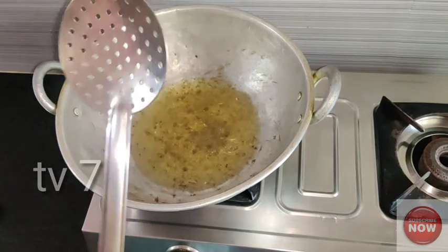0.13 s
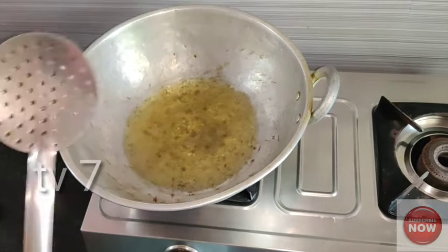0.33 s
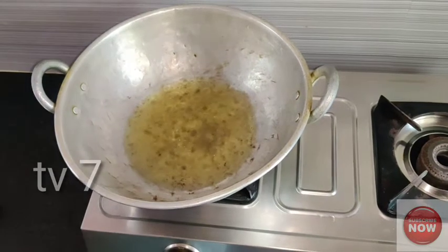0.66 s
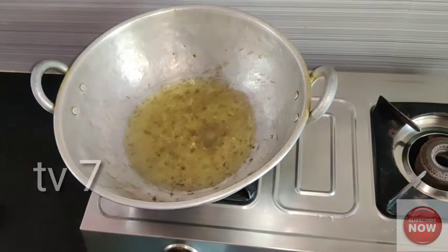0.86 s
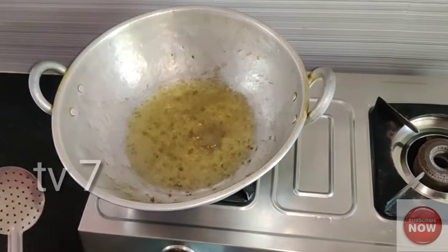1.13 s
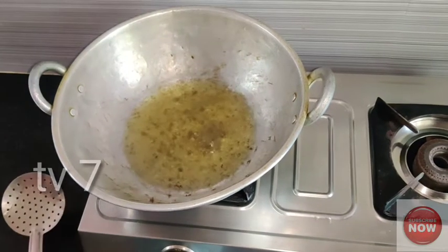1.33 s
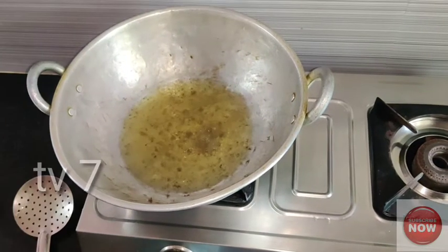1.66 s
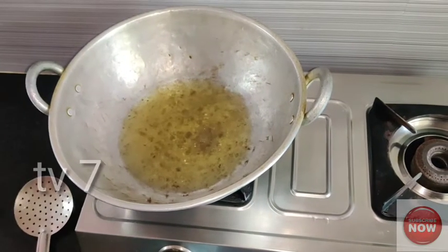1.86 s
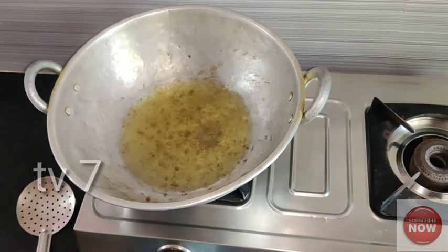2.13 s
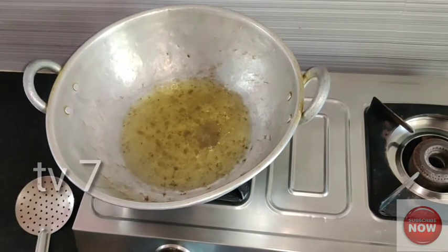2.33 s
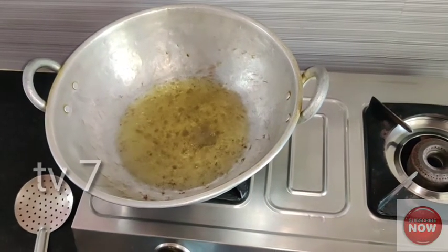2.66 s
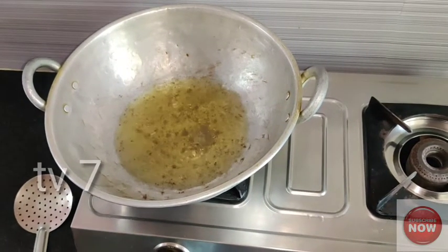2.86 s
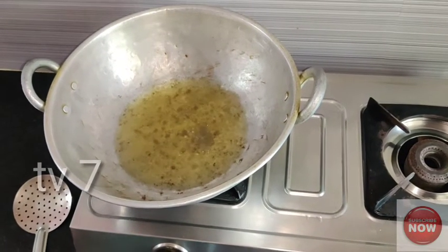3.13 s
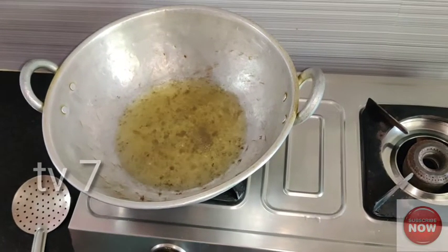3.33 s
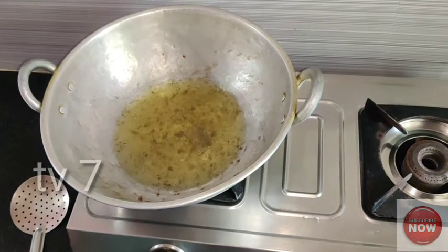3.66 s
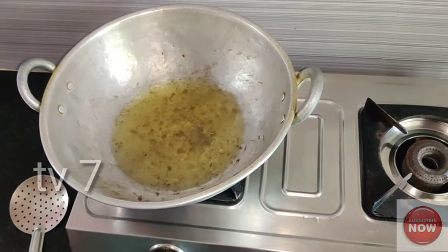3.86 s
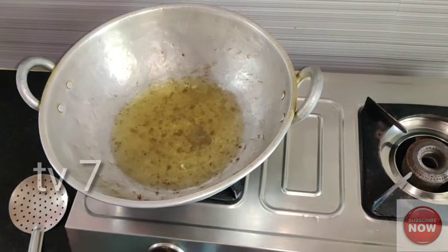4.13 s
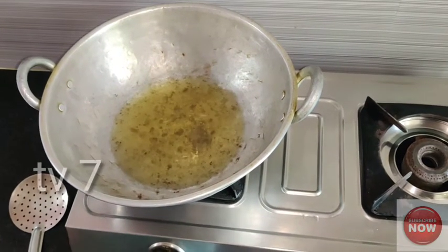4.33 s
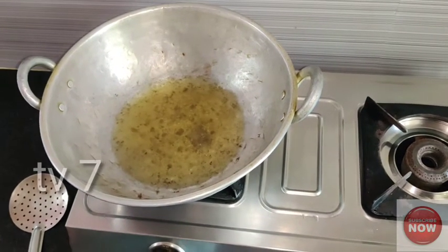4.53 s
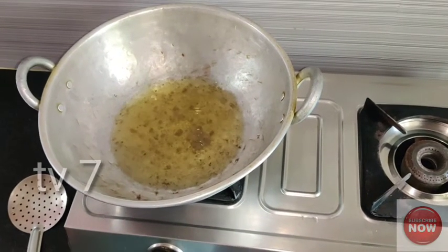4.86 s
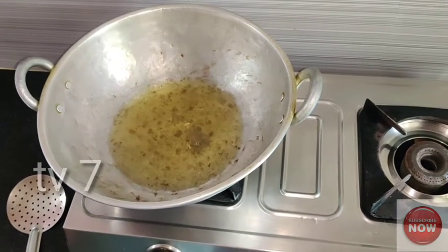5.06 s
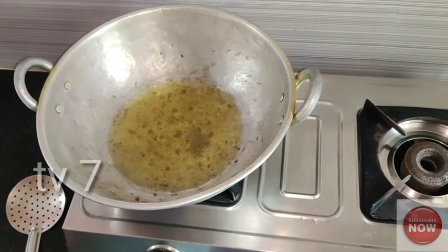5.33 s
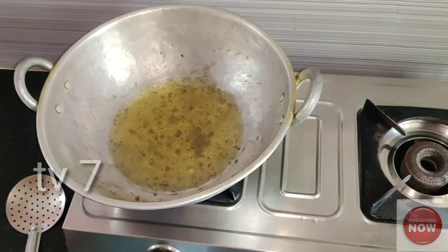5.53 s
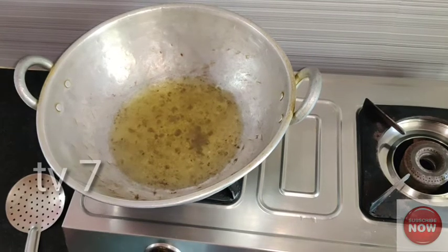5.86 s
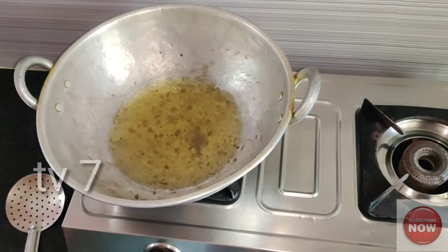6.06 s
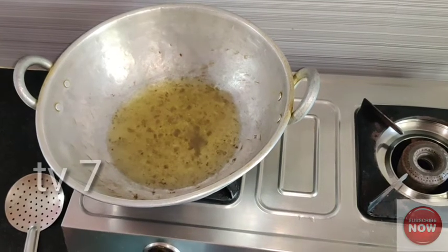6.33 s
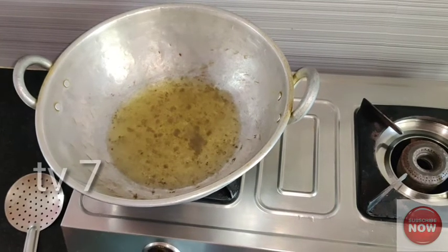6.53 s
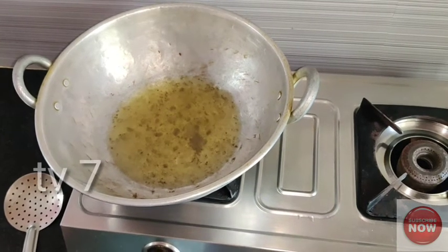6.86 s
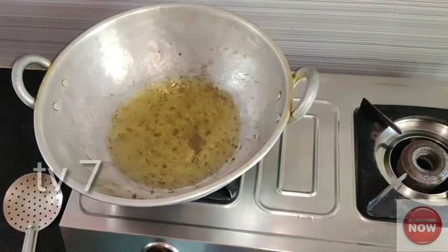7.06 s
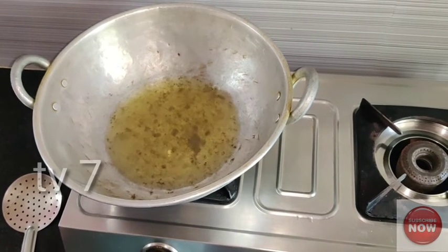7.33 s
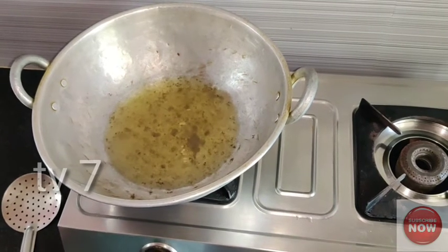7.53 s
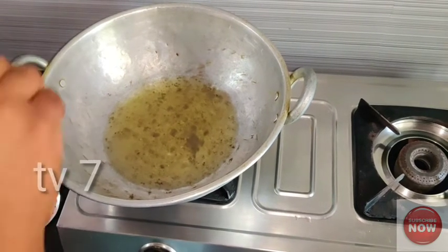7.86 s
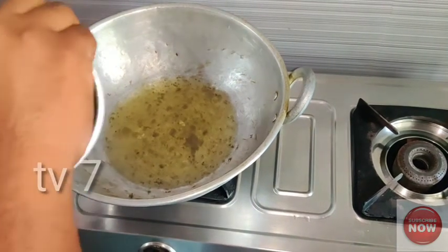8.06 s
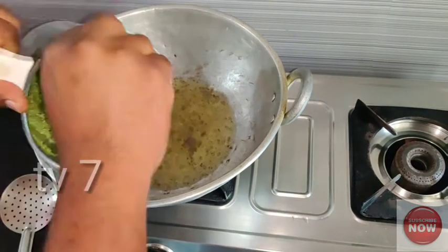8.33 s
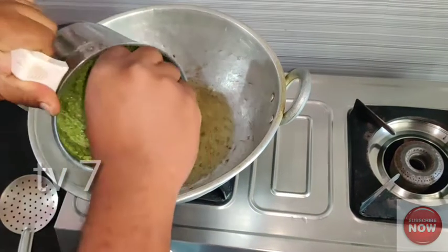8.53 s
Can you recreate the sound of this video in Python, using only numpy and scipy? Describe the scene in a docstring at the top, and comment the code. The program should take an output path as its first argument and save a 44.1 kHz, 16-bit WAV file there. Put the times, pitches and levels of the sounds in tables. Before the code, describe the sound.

Hot oil sizzles with a soft, fine hiss in a metal pan, heard from close above in a kitchen. From the start, seeds burst in sharp, irregular pops, each with a small metallic plink and a short echo. Between about 0.7 and 1.2 seconds, a skimmer is laid on the counter with a few dull, clattering knocks; a lighter clunk follows at 3.6 seconds. The popping is thickest from 1 to 3 seconds, stays lively until 5, then thins to occasional bursts. Dry, very close snaps cut through around 1.3, 1.5 and 4.6 seconds, and loudest at 6, 6.9 and 8 seconds. The sizzle slowly calms but continues to the end, near 8.7 seconds. A faint low rumble and hum lie underneath, and a distant engine swells gently outside around 5, 6.5 and 8.5 seconds.

```python
"""Hot oil sizzles and seeds burst in a deep metal pan on a gas stove, heard from a phone held above it.
Each shell cracks, its jet of steam sounds two pitches, the pan rings and the hard kitchen echoes.
The sizzle of tiny steam bubbles slowly calms, and a skimmer is laid on the counter.
Farther off, outside, an engine drones over street murmur, a motor hum and a low rumble.
The phone's limiter pulls everything down for a moment after the sharpest snaps."""
import sys
import numpy as np
from scipy import signal
from scipy.fft import rfft, irfft
from scipy.io import wavfile
from scipy.ndimage import uniform_filter1d, minimum_filter1d

SR = 44100
rng = np.random.default_rng(int(sys.argv[2]) if len(sys.argv) > 2 else 0)


def log_audio(samples):
    """Write samples as a 16-bit WAV file to the path given in sys.argv[1]."""
    # one column per channel
    frames = np.atleast_2d(samples).T
    # limit to full scale, then quantise
    limited = np.clip(frames, -1, 1)
    pcm = np.round(limited * 32767).astype(np.int16)
    wavfile.write(sys.argv[1], SR, pcm)


N = 383669

# Seeds bursting in the pan below the phone, plus the clatter of two counter knocks (1.14 and 3.57 s).
# Each row: start in seconds, strength in dB; then, all in dB, bass and treble over strength, top edge
# over treble, left minus right, kitchen echo; last, the steam pocket's low and high pitch in Hz.
BURSTS = [(0.1242, -38, -9, 6, -3, -7, -5, 2340, 8140), (0.3861, -30.5, -23, 15, -25, 0, -12, 3920, 5100),
          (0.4372, -14.5, -26, 1, -17, 1, -10.5, 2550, 5400),
          (0.5392, -50, 0, 18.5, -13, -8, -5, 2490, 6100), (0.5946, -28, -17, 4, -11, -3, -7.5, 3550, 7850),
          (0.633, -37, -1, 8, -6, -3, -7, 3340, 6060), (0.659, -28.5, -4, 8, -29, 0, -6, 2310, 8400),
          (0.9232, -15, -30, 4.5, -11, 2, -10.5, 2530, 6210),
          (1.0034, -28.5, -8, 2.5, -18, 11.5, -13, 2220, 6070),
          (1.1119, -41.5, -3.5, 6, -1, -6, 2.5, 2900, 8200),
          (1.1429, -34.5, -2.5, 0, -8.5, 0, 1, 1640, 6430),
          (1.3208, -19.5, -4.5, 11.5, -3, 6, -10, 3860, 6330),
          (1.3523, -20, -21, 7.5, -3, 8, -4.5, 2000, 5100),
          (1.4202, -30.5, -13, 2.5, -19, 15, 0, 3030, 5920),
          (1.4568, -20.5, -25, 7.5, 1, 18, -13, 3460, 4080),
          (1.528, -29, -12.5, 6.5, -6, 6, -0.5, 3050, 5800),
          (1.7504, -17, -12, 3, -10, 7.5, -10, 1980, 6260), (1.8377, -18.5, -36, 2, -6, 2, -8, 2480, 5940),
          (1.8766, -19, -12, 3.5, -5, 3.5, -3.5, 2300, 5870),
          (2.0234, -20.5, -8.5, 1, -20, 0.5, -8.5, 2600, 4650),
          (2.0907, -22.5, -21, 2, -10, -2, -3.5, 3940, 4400),
          (2.1084, -26, -10, 16.5, -7, 0, -10.5, 2160, 6320), (2.1304, -39, 1, 22, 6.5, 6, -14, 3850, 4800),
          (2.2846, -25.5, -35, 11, -8, 13, -11, 3900, 3800),
          (2.3298, -27.5, -7.5, -3, -5, 16.5, -2.5, 2490, 5730),
          (2.3635, -26, -20, 6, -9, 3, -9, 2300, 6200), (2.3694, -17.5, -32, 2.5, -1.5, 0, -8, 3080, 6100),
          (2.4002, -32, -1, 11, -18, 8, -7, 1870, 5760), (2.4604, -19.5, -35, 5, -4, 7, -6, 2270, 4930),
          (2.4857, -37.5, -13, 20.5, -5, 12, -10, 4000, 5700),
          (2.5366, -15, -17, 6, -2.5, 4, -8.5, 1844, 6080), (2.6548, -27, -11, 8.5, -11, 8, -8, 2400, 6100),
          (2.7124, -36.5, -6.5, 3.5, -5, 4, 4.5, 2490, 5800),
          (2.7856, -20, -11.5, 8.5, -6, 6, -10, 2510, 6040),
          (3.1403, -32.5, 2, -0.5, 1.5, -3, -8.5, 2120, 6410),
          (3.2328, -34.5, -3, 10.5, -13, 0, -1, 1890, 8850),
          (3.3977, -16.5, -21, 5.5, -2, 3, -8.5, 2540, 5990),
          (3.5111, -20.5, -14.5, 8, -5.5, 3.5, -7, 3270, 5420),
          (3.5726, -21, 4, 0.5, -21, 0.5, -13.5, 3100, 5800),
          (3.6764, -20, -29, 6, -5, 0, -12.5, 3650, 4370), (3.7155, -30, -14, 7, -17, 3, -6.5, 3060, 4960),
          (3.8598, -22, -14, 2.5, -30, -1, -11, 2120, 4070),
          (3.894, -19, -7, 1, -7.5, -1, -8.5, 2100, 4500),
          (4.0415, -32.5, -29, 1.5, -8, -6, -5, 2260, 8000),
          (4.1213, -25.5, -2.5, 6.5, -7, -3.5, -11, 3190, 6060),
          (4.3009, -30.5, -18, 5.5, -2, -1, -6.5, 2040, 7900),
          (4.3868, -17, -11.5, -3.5, -29, -2.5, -11.5, 3600, 5330),
          (4.6673, -19, -24, 5.5, 0.5, 7.5, -9, 2170, 6100),
          (4.7207, -22.5, -17, 3.5, -7, 8, -7.5, 3080, 4200),
          (4.781, -20.5, -17.5, 4, -4, -2, -8.5, 2390, 6050),
          (4.9695, -31.5, -3, 8.5, -21, 1, -7.5, 2040, 6840), (5.44, -56, 6, 22.5, -4, -10, -9, 3850, 8900),
          (5.5437, -20, -8.5, 6.5, -8, 4.5, -12.5, 3800, 6340),
          (5.668, -43, -6, 6, -3, -2, -1.5, 2040, 5840),
          (5.856, -21.5, -18.5, -1.5, -23.5, -1, -9, 2086, 5930),
          (6.2906, -37.5, -13, 10.5, -13, -1, -9, 2960, 6200),
          (7.5921, -30, -18, 9.5, -10, -0.5, -7.5, 3100, 7500),
          (7.8288, -59, 10, 24, 0, -12, -12, 1540, 8100)]
# Tone of a burst. Each row: frequency in Hz, relative level in dB.
BURST_COLOUR = [(320, -70), (550, -98), (701, -11.5), (808, -19.5), (958, -14), (1100, -16.5),
                (1510, -17.5), (1790, -5), (1920, -3.5), (2350, -0.5), (3980, -1), (6090, 0), (10000, -7.5),
                (15100, -32), (16500, -98)]
# Edges in Hz of four bands: bass, middle, treble, top edge.
BAND_EDGES = (600, 1500, 4000, 9000, 16500)
# Decay in those bands. Each row: pan ring, kitchen echo, both in seconds to fall 60 dB.
BAND_DECAYS = [(0.015, 0.35), (0.052, 0.37), (0.035, 0.24), (0.013, 0.09)]


def bursts():
    """Each shell cracks, vents steam, rings the pan and echoes; two knocks clatter with the same sound."""
    s, db, bass_db, treble_db, edge_db, pan_db, echo_db, low_hz, high_hz = np.transpose(BURSTS)
    high_db = db + treble_db
    top_pan_db = 1.5 + 0.71 * pan_db  # the highs lean less to the side of the burst
    high_pan_db = (pan_db + top_pan_db) / 2
    patchy = undb(2.9 * np.array([walk(500), walk(500)]))  # uneven reflections off the walls
    crack = strikes(s, high_db - 10, pan_db, t60=0.0063, rise_s=0.00042)
    out = crack * unit(shape(noise(0.27), BURST_COLOUR))
    bands = zip(BAND_EDGES, BAND_EDGES[1:], (db + bass_db, db, high_db, high_db + edge_db),
                (pan_db, pan_db, high_pan_db, top_pan_db), BAND_DECAYS)
    for lo, hi, band_db, lean_db, (ring_s, echo_s) in bands:
        direct = strikes(s, band_db - 2, lean_db, ring_s, rise_s=0.0018)
        echo = strikes(s, band_db + echo_db - 1.5, 0.89 * lean_db, echo_s, rise_s=0.0071)
        out += (direct + echo) * patchy * unit(shape(noise(0.18), BURST_COLOUR, lo, hi))
    for k in range(len(s)):
        hiss = rng.standard_normal((3, SR // 2))
        steam = 0.24 * hiss[0] + 0.63 * hiss[1:]
        low = steam_pocket(steam, low_hz[k], db[k] + 18, pan_db[k], echo_db[k], q=12.8)
        high = steam_pocket(steam, high_hz[k], high_db[k] + 12, high_pan_db[k], echo_db[k], q=16.2)
        metal = pan_ring(low_hz[k]) * undb(db[k]) * sides(pan_db[k])
        add(out, s[k], low + high + metal)
    return out


def steam_pocket(steam, hz, db, pan_db, echo_db, q):
    """The jet peaks a moment after the shell splits; jet and echo sound one pitch of the pocket."""
    t = np.arange(SR // 2) / SR
    spurt = undb(7) * t / 0.0015 * np.exp(1 - t / 0.00092)
    tail = (1 - np.exp(-t / 0.00014)) * undb(-60 * t / 0.026)
    echo = (1 - np.exp(-t / 0.0018)) * undb(echo_db + 4 - 60 * t / 0.27)
    return resonate((sides(pan_db) * (spurt + tail) + echo) * steam, [(hz, hz / q, db)])


# The metal pan's modes. Each row: pitch in Hz, relative level in dB, ring time in seconds.
PAN_MODES = [(764, -9.5, 0.32), (990, -7, 0.25), (1120, -3.5, 0.25), (1720, 5.5, 0.28), (1980, 2, 0.23),
             (2064, 9.5, 0.2), (2460, 1.5, 0.13), (2600, 2.5, 0.31), (3020, -25, 0.14), (3568, -42, 0.067),
             (4840, 12, 0.15), (5090, 3, 0.25), (6074, 11, 0.11)]


def pan_ring(pocket_hz):
    """Heat and moving oil detune the pan from blow to blow; the pocket rings on as a plink."""
    t = np.arange(SR // 2) / SR
    detune = 1 + 0.0299 * rng.standard_normal()
    plink = [pocket_hz, -10, 0.12]
    modes = np.vstack([np.array(PAN_MODES) * [detune, 1, 1] + [0, -20, 0], plink])
    return ring(modes) * (1 - np.exp(-t / 0.004))


# A seed hits the skimmer. Each row: start in seconds, gain in dB.
SKIMMER_HITS = [(2.13, -23)]
# The skimmer's modes. Each row: pitch in Hz, relative level in dB, ring time in seconds.
SKIMMER_MODES = [(4800, 3, 0.32), (6304, -4, .12), (7400, -8, .3), (8775, 7, 0.089), (11600, -4, 0.18)]


def skimmer_ping():
    """Struck by a seed, the steel rings in a few high partials."""
    out = np.zeros((2, N))
    for s, db in SKIMMER_HITS:
        add(out, s, ring(SKIMMER_MODES, scatter=0.12) * undb(db))
    return out


# Dry snaps close to the microphones. Each row: start in seconds, strength in dB, left minus right
# in dB, echo over strength in dB.
CLOSE_SNAPS = [(1.29, -4, 4, -30), (1.457, -4, 8, -32), (2.2866, -12.5, 4, -35), (4.619, -2.5, 1, -30),
               (6.043, 3, 1, -20.5), (6.488, -22, 0, -28), (6.9358, 3.5, 13, -28), (7.994, 5.5, 8.5, -20.5)]
# Tone of a snap. Each row: frequency in Hz, relative level in dB.
SNAP_TONE = [(100, -46), (1000, -10), (3500, -16.5), (6000, -16.5), (9000, -4), (13000, -9.5),
             (16500, -7.5)]


def snaps():
    """A single sharp pressure pulse with a split-second rattle, then a thin bright echo."""
    s, db, pan_db, echo_db = np.transpose(CLOSE_SNAPS)
    pulse = np.zeros(N)
    pulse[(s * SR).astype(int) + 4] = undb(db + 5)
    rattle = strikes(s, db - 6.5, pan_db, t60=0.005, rise_s=0.0001)
    rattle *= unit(shape(noise(0.84), SNAP_TONE))
    echo = strikes(s, db + echo_db, 0.6 * pan_db, t60=0.22, rise_s=0.00032)
    echo *= unit(shape(noise(0.072), OIL_COLOUR))
    return shape(pulse, SNAP_TONE) + rattle + echo


# The oil, heard from above the pan. Each row: time in seconds, level in dB.
OIL_LEVEL = [(0.0, -34.5), (1.0, -37), (2.4, -37), (3.0, -36), (5.9, -38), (7.3, -40.5), (8.7, -40.5)]
# Tone of the oil. Each row: frequency in Hz, relative level in dB.
OIL_COLOUR = [(710, -18.5), (1200, -16), (1510, -15.5), (1880, -11.5), (2730, -11), (3400, -7),
              (4520, -4.5), (5760, 2.5), (7170, 0.5), (8000, 2.5), (14900, -12), (16000, -32), (16500, -72)]


def sizzle():
    """Thousands of tiny steam bubbles a second, some larger, over their own blur; the pan colours them."""
    bubbles_per_s, split_hz = 2500, 11000
    size_db = np.minimum(1.2 * rng.exponential(size=(2, N)), 12)
    bubbles = (rng.random((2, N)) < bubbles_per_s / SR) * rng.standard_normal((2, N)) * undb(size_db)
    blur = rng.standard_normal((2, N))
    fizz = shape(noise(0.03, unit(bubbles) * undb(-9.5) + blur), OIL_COLOUR)
    fizz += resonate(fizz, [(hz, 120, -3) for hz, _, _ in PAN_MODES])
    flat = [(1, 0), (SR, 0)]
    body, top = unit(shape(fizz, flat, hi=split_hz)), unit(shape(fizz, flat, lo=split_hz))
    top *= undb(-13 - 0.17 * np.arange(N) / SR)  # the top hiss dies out a little faster
    return (body + top) * undb(curve(OIL_LEVEL) + 0.7 * walk(8))


# Skimmer and hands on the kitchen counter. Each row: start in seconds, strength in dB, left minus
# right in dB, thud gain in dB, clunk pitch in Hz, clunk level in dB.
COUNTER_KNOCKS = [(0.52, -24, 0, -10, 760, -60), (0.713, -11, -1.5, -8, 933, -22),
                  (0.785, -11.5, -1.5, -29, 950, -26), (0.819, -17.5, 2, -9.5, 890, -51),
                  (1.142, -17, -1.5, -4, 956, -22.5), (3.571, -25, 1, -29, 1094, -14.5)]
# The counter's broad modes. Each row: centre in Hz, width in Hz, gain in dB.
COUNTER_MODES = [(344, 136, -1), (470, 130, 1), (622, 137, -2), (759, 142, 1.5), (890, 61, -1),
                 (1166, 27, -29)]
# The thud beneath them. Each row: centre in Hz, width in Hz, gain in dB.
THUD_MODES = [(117, 22, -8.5), (211, 34, -2.5)]


def counter_knocks():
    """Dull blows rattle the counter's broad modes and the steel over a short thud."""
    out, t = np.zeros((2, N)), np.arange(SR // 2) / SR
    dull = signal.butter(6, 1150, fs=SR, output="sos")
    envelope = (1 - np.exp(-t / 0.00062)) * (undb(-60 * t / 0.38) + 0.6 * undb(-60 * t / 0.0067))
    for s, db, pan_db, thud_db, hz, clunk_db in COUNTER_KNOCKS:
        shake = rng.standard_normal((3, len(t)))
        blow = envelope * sides(pan_db)
        rattle = blow * (0.38 * shake[0] + 0.58 * shake[1:])
        body = signal.sosfilt(dull, resonate(resonate(rattle, COUNTER_MODES), COUNTER_MODES))
        thud = resonate(blow * shake[0], THUD_MODES)
        clunk = resonate(rattle, [(hz, 150, clunk_db + 7.5)])
        clunk += undb(clunk_db - 60 * t / 0.056) * np.sin(2 * np.pi * hz * t)
        steel = resonate(rattle, [(2600, 1070, db - 6)])
        add(out, s, undb(db) * body + undb(thud_db) * thud + clunk + steel)
    return out


# The engine outside takes load. Each row: peak time in seconds, firing rate in Hz, peak level in dB.
ENGINE_LOADS = [(5.2, 46.1, -43), (6.65, 47.3, -41), (8.5, 46.6, -45)]
# Its exhaust note. Each row: multiple of the firing rate, relative level in dB.
EXHAUST_HARMONICS = [(1, 1), (2, -10), (3, -12.5), (4, -23), (5, -28), (6, -18), (7, -9.5), (8, -4),
                     (9, -11), (10, -20), (11, -12), (12, -23), (13, -12.5), (14, -16), (15, -30)]


def engine():
    """The exhaust drone swells under load and fades, each overtone wavering on its own."""
    s, hz, db = np.transpose(ENGINE_LOADS)
    firing_hz = np.interp(np.arange(N) / SR, s, hz) * (1 + 0.0048 * walk(20))
    phase = 2 * np.pi * np.cumsum(firing_hz) / SR
    drone = sum(undb(harmonic_db + 3 * walk(6.5)) * np.sin(k * turn + 2 * np.pi * rng.random())
                for k, harmonic_db in EXHAUST_HARMONICS for turn in [phase])
    return unit(drone) * swells(s, db, rise_db_per_s=55, fall_db_per_s=36)


# Low swells: the room ringing after the counter knocks, later the street murmur.
# Each row: peak time in seconds, peak level in dB.
LOW_SWELLS = [(0.8, -54), (1.15, -45), (3.78, -45), (5.26, -46.5), (6.72, -45.5), (8.65, -48.5)]
# Tone of the murmur. Each row: frequency in Hz, relative level in dB.
MURMUR_COLOUR = [(65, -37), (110, -5), (247, -10.5), (301, -8), (677, -17.5), (704, -14.5), (867, -18),
                 (1200, -25.5), (1560, -21), (2500, -21.5), (3250, -37), (5500, -120)]


def low_murmur():
    """A quiet murmur swells, first as the room rings after the knocks, later with the street."""
    murmur = shape(noise(0.91), MURMUR_COLOUR, hi=520) + shape(noise(0.11), MURMUR_COLOUR, lo=520)
    swell = swells(*np.transpose(LOW_SWELLS), rise_db_per_s=33, fall_db_per_s=33)
    return unit(murmur) * np.hypot(undb(-53.5), swell) * undb(1.5 * walk(9.9))


def motor_hum(hz=298, db=-58.5):
    """A motor holds one faint tone that wavers in level."""
    return np.sin(2 * np.pi * hz * np.arange(N) / SR) * undb(db + 2 * walk(6))


# The rumble from outside. Each row: time in seconds, level in dB.
DEEP_LEVEL = [(0.0, -50), (1.1, -46.5), (1.4, -47), (1.85, -48.5), (2.6, -49.5), (3.1, -44), (4.1, -45.5),
              (4.8, -48.5), (5.8, -41), (6.15, -44.5), (6.75, -39.5), (7.3, -45.5), (8.2, -42),
              (8.7, -46.5)]
# Its tone. Each row: frequency in Hz, relative level in dB.
DEEP_COLOUR = [(18, -30), (26, 0), (33, 2), (40, -6), (47, 5), (54, -6), (66, -23), (85, -10), (96, -3),
               (110, -23), (135, -20.5), (200, -50)]


def rumble():
    """Deep noise rises and sinks under everything, almost the same on both sides."""
    return unit(shape(noise(0.99), DEEP_COLOUR)) * undb(curve(DEEP_LEVEL) + 1.8 * walk(5))


def undb(db):
    return 10 ** (np.asarray(db) / 20)


def unit(x):
    return x / np.sqrt(np.mean(x ** 2))


def sides(pan_db):
    """Left and right gains, pan_db apart."""
    return undb(np.array([[pan_db], [-pan_db]]) / 2)


def curve(table):
    """Join (seconds, value) points sample by sample."""
    return np.interp(np.arange(N) / SR, *np.transpose(table))


def shape(x, points, lo=0, hi=SR):
    """Filter by (Hz, dB) points, keeping only lo to hi."""
    f = np.arange(N // 2 + 1) * SR / N + 1
    hz, db = np.transpose(points)
    return irfft(rfft(x) * undb(np.interp(np.log(f), np.log(hz), db)) * (f >= lo) * (f < hi), N)


def noise(alike, source=None):
    """Two channels that share the part alike of their power."""
    mid, side = rng.standard_normal((2, N)) if source is None else source
    return np.sqrt(1 + alike) * mid + np.sqrt(1 - alike) * side * np.array([[1], [-1]])


def walk(rate):
    """Random levels held 1 / rate seconds and smoothed twice; spread near 1."""
    k = int(SR / rate)
    held = np.repeat(rng.standard_normal(N // k + 1), k)
    return 1.2 * uniform_filter1d(uniform_filter1d(held, k), k)[:N]


def strikes(s, db, pan_db, t60, rise_s):
    """Envelope that leaps at each time and dies away; powers of overlapping strikes add."""
    power = np.zeros((2, N))
    starts = (np.asarray(s) * SR).astype(int)
    np.add.at(power, (slice(None), starts), undb(2 * db + np.array([pan_db, -pan_db])))
    fall, rise = np.exp(-2 * np.log(1000) / (t60 * SR)), np.exp(-1 / (rise_s * SR))
    return np.sqrt(np.abs(signal.lfilter([1 - rise], np.convolve([1, -fall], [1, -rise]), power)))


def swells(s, db, rise_db_per_s, fall_db_per_s):
    """Gain that climbs to each peak and sinks after it; powers add."""
    late = np.arange(N) / SR - s[:, None]
    db = db[:, None] + np.minimum(rise_db_per_s * late, -fall_db_per_s * late)
    return np.sqrt(np.sum(undb(2 * db), axis=0))


def resonate(x, modes):
    """Sum of (Hz, width Hz, dB) resonances."""
    return sum(undb(db) * signal.lfilter(*signal.iirpeak(hz, hz / width, SR), x) for hz, width, db in modes)


def ring(modes, scatter=1):
    """Half a second of decaying partials, scattered in strength and phase in each channel."""
    hz, db, t60 = np.transpose(modes)[..., None]
    t = np.arange(SR // 2) / SR
    fade = undb(db - 60 * t / t60)
    chance = scatter * rng.standard_normal((2, 2, len(modes), 1))
    return np.array([np.sum(undb(3.7 * strength) * fade * np.sin(2 * np.pi * (hz * t + phase)), axis=0)
                     for strength, phase in chance])


def add(out, s, sound):
    """Mix a sound in at s seconds."""
    i = int(s * SR)
    out[:, i:i + sound.shape[1]] += sound[:, :N - i]


def scene():
    """The pan and counter close by, over the low background."""
    kitchen = bursts() + skimmer_ping() + snaps() + counter_knocks() + sizzle()
    return kitchen + rumble() + low_murmur() + engine() + motor_hum()


# The phone's two microphones above the pan. Each row: frequency in Hz, left minus right in dB.
MIC_BALANCE = [(60, 1.5), (110, 3), (200, 3.5), (380, 3.5), (700, 1.5), (1290, 4), (2380, 2), (4400, 0.5),
               (8120, -11), (15000, -12.5)]


def record(dry):
    """Two unlike microphones, a look-ahead limiter that holds and lets go quickly, and a steep top cut."""
    ceiling, ahead_s, hold_s, top_hz = 0.79, 0.007, 0.088, 16300
    balance = np.array(MIC_BALANCE)
    mics = np.array([shape(dry[0], balance * [1, 0.5]), shape(dry[1], balance * [1, -0.5])])
    ahead, span = int(ahead_s * SR), int((ahead_s + hold_s) * SR) // 2 * 2 + 1
    needed = np.minimum(1, ceiling / (np.abs(mics).max(axis=0) + 1e-9))
    held = minimum_filter1d(needed, span)
    gain = np.concatenate([np.ones(span // 2 - ahead // 2), uniform_filter1d(held, ahead)])[:N]
    return signal.sosfilt(signal.ellip(10, 0.2, 70, top_hz, fs=SR, output="sos"), mics * gain)


dry = scene()
out = record(dry)
log_audio(out)
```